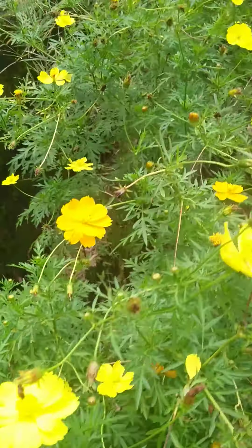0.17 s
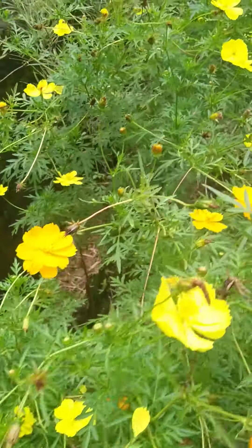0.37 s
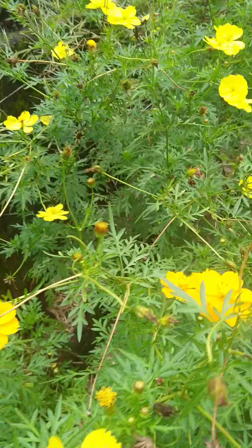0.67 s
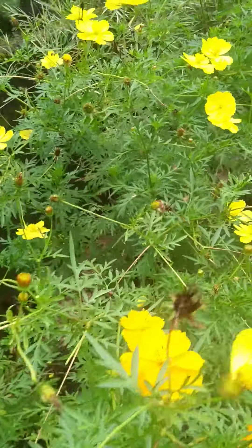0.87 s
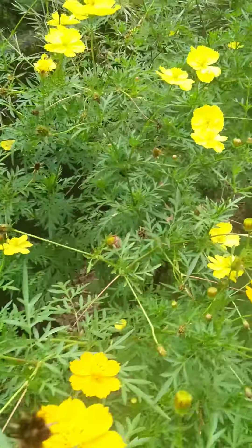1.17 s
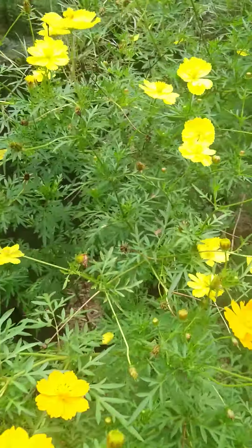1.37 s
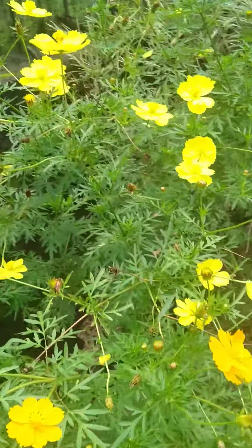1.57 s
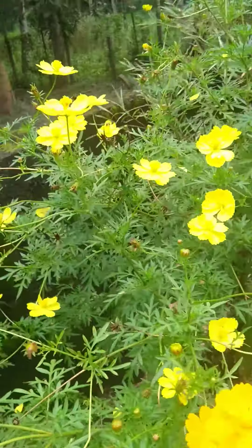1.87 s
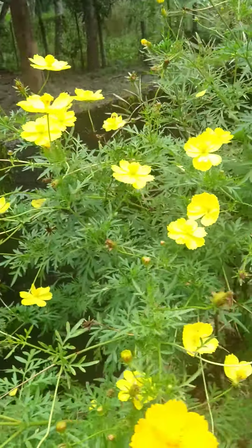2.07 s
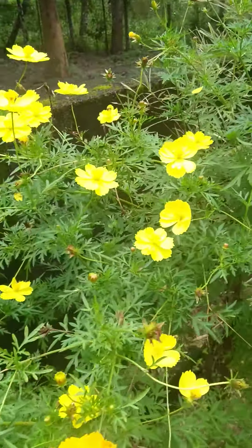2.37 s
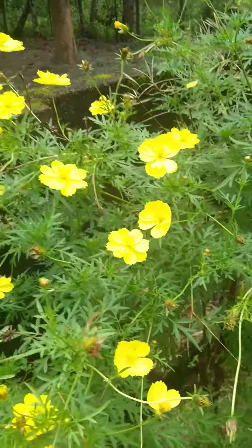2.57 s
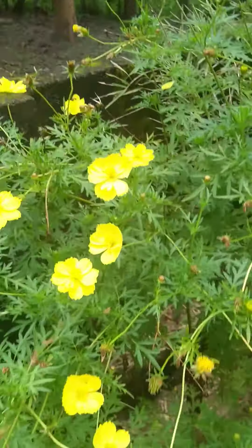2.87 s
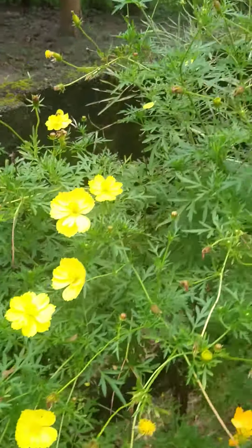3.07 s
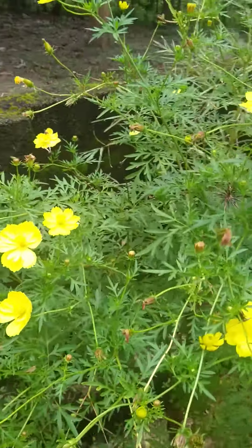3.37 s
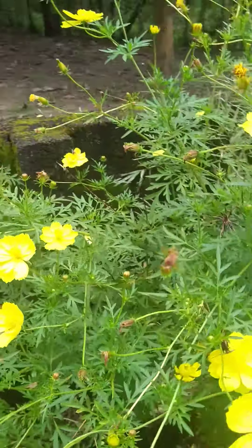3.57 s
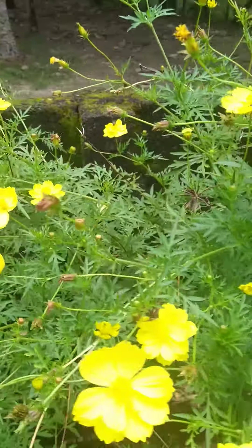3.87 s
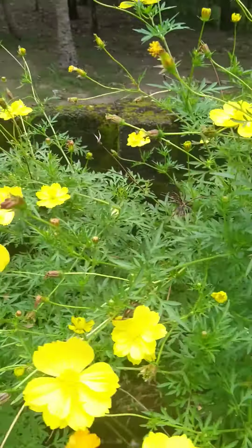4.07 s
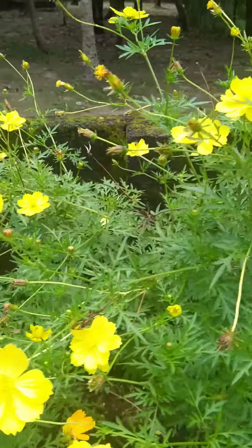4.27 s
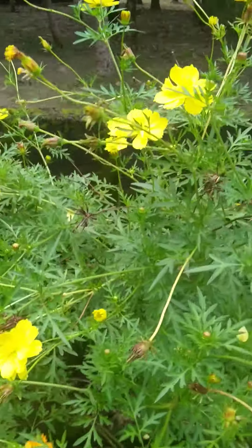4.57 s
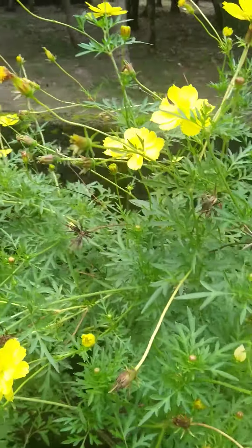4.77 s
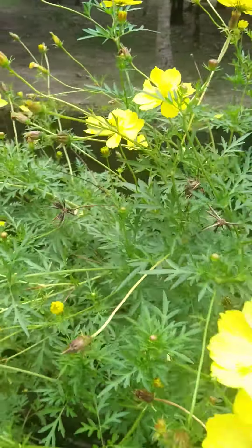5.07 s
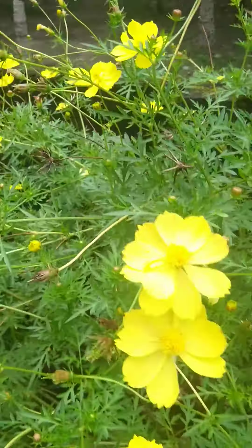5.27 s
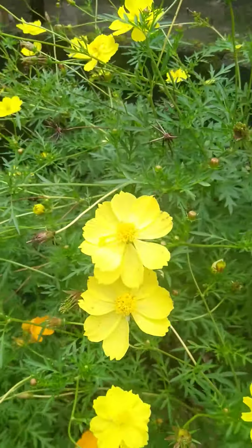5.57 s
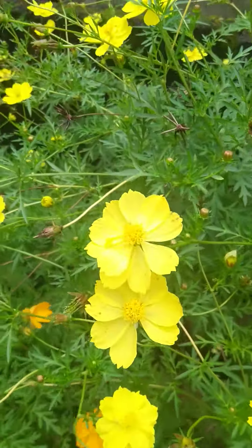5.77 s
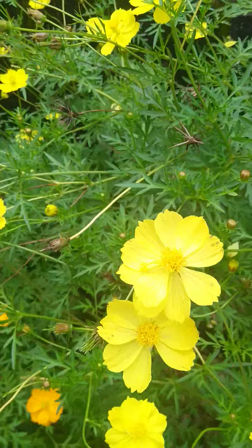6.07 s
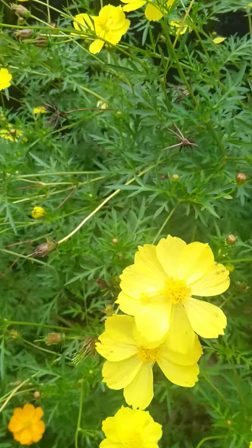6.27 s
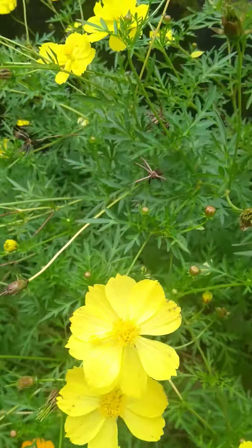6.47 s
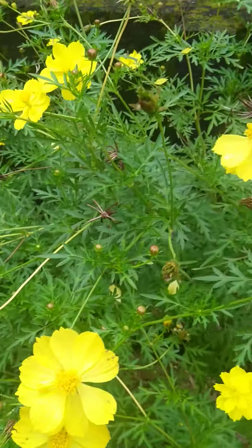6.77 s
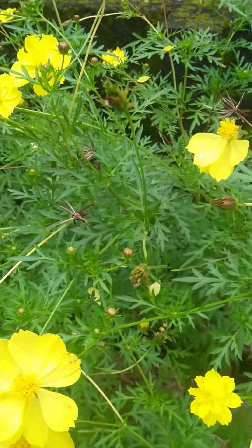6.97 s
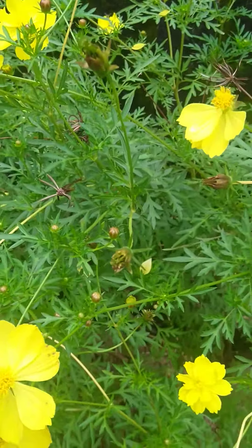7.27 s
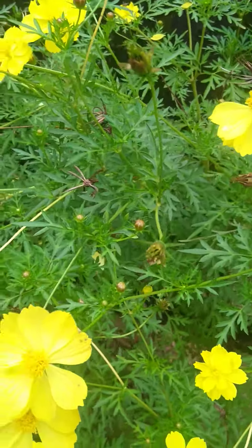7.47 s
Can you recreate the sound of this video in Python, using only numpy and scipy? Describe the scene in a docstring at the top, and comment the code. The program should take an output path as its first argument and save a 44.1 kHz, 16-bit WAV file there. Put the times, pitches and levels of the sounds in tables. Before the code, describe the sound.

Outdoors in a wooded park, a flock of harsh birds squawks almost continuously, calls overlapping with short echoes among the trunks. A hand-held phone moves along flowers: dull low bumps and rumble are strongest in the first three seconds, with scuffs and dry ticks. Leaves brush past around five seconds, then the bird chorus thickens towards the end.

```python
"""A wooded park: a flock of harsh-voiced birds squawks, calls overlapping and ringing among the trunks.
Each squawk is a stack of harmonics on an arch of pitch, shaken by a rasping syrinx and coloured by the throat;
a few sliding sines whistle between them, and rougher far calls answer in bouts.
A hand-held phone moves along a flower bed: damped sine bumps, and filtered noise for scuffs, rustling leaves,
twig ticks, a low rumble and a faint hush."""
import sys
import numpy as np
from scipy import signal
from scipy.fft import rfft, irfft, next_fast_len
from scipy.io import wavfile

SR = 44100
rng = np.random.default_rng(int(sys.argv[2]) if len(sys.argv) > 2 else 0)


def wrap_up_sound(samples):
    """Save the sound to the file named by the first command line argument, as 16-bit audio."""
    columns = np.atleast_2d(samples).T
    # keep every value between -1 and 1, then stretch to whole-number steps
    tamed = np.clip(columns, -1, 1)
    steps = np.round(tamed * 32767).astype(np.int16)
    wavfile.write(sys.argv[1], SR, steps)


N = 336483
TIME = np.arange(N) / SR
TOP_HZ = 15500  # upper limit of the whole scene

# Firm bumps of steps and of the hand on the phone: [t/s, strength/dB, ring f/Hz]
BUMPS = [(.01, -24.5, 278), (.19, -33, 256), (.49, -17, 151), (0.528, -13.5, 124), (.606, -16, 194),
         (0.699, -14.5, 133), (1.186, -30.5, 76), (1.816, -27, 147.5), (2.421, -47.5, 232),
         (2.495, -18, 181), (2.565, -18, 245), (2.637, -15.5, 216), (2.82, -14, 190), (2.88, -18, 158),
         (3.572, -18.5, 194), (3.609, -26, 220), (4.068, -19, 207), (4.148, -23.5, 205.5),
         (4.252, -29.5, 201), (4.418, -26.5, 215), (4.564, -23.5, 194), (5.519, -30, 190),
         (5.735, -25, 176), (5.873, -32.5, 127), (5.96, -21, 177), (6.01, -24.5, 210),
         (6.065, -25.5, 169.4), (6.454, -25.5, 166), (6.508, -29.5, 200), (6.546, -27.5, 190),
         (6.894, -48, 198), (6.991, -26, 180), (7.103, -30, 190), (7.391, -34, 190)]


def undb(db):
    """Decibels to gain."""
    return 10 ** (np.asarray(db) / 20)


def unit(x):
    """Scale to rms 1."""
    return x / np.sqrt(np.mean(x ** 2) + 1e-20)


def colour(x, points, tilt_db=0):
    """Filter by an outline of [f/Hz, level/dB], tilted about 4096 Hz by so many dB an octave."""
    n = x.shape[-1]
    size = next_fast_len(n + 1024)
    octave = np.log2(np.maximum(np.fft.rfftfreq(size, 1 / SR), 1))
    hz, db = np.transpose(points)
    outline_db = np.interp(octave, np.log2(hz), db)
    # the tilt levels off below 1024 Hz and above 8192 Hz
    lean_db = tilt_db * (np.clip(octave, 10, 13) - 12)
    return irfft(rfft(x, size) * undb(outline_db + lean_db), size)[..., :n]


def wobble(n, hz):
    """Random motion of rms 1: noise low-passed at hz, with the filter already settled."""
    lead = SR // 10
    lowpass = signal.butter(2, hz, fs=SR, output="sos")
    return unit(signal.sosfilt(lowpass, rng.standard_normal(n + lead))[lead:])


def swell(t, length, attack, release):
    """Smooth opening and closing of a sound (times in s)."""
    opening = np.sin(np.pi / 2 * np.clip(t / attack, 0, 1))
    closing = np.sin(np.pi / 2 * np.clip((length - t) / release, 0, 1))
    return opening * closing


def add(out, s, x):
    """Mix x into out from time s; it may already be sounding at the start."""
    i = int(s * SR)
    x, i = x[..., max(-i, 0):], max(i, 0)
    out[..., i:i + x.shape[-1]] += x[..., :max(N - i, 0)]


def stereo_noise(n, shared):
    """Noise at two ports, with a share of its power in common."""
    common = rng.standard_normal(n)
    separate = rng.standard_normal((2, n))
    return np.sqrt(shared) * common + np.sqrt(1 - shared) * separate


def hush(level_db=-70):
    """The faint hush of the park: steady, wide, coloured noise."""
    # Outline of the hush: [f/Hz, level/dB]
    air = [(200, 18), (600, 13.5), (1200, -7), (2200, 12.5), (4500, 1.5), (8000, -1), (14000, -4),
           (16000, -37)]
    return undb(level_db) * unit(colour(stereo_noise(N, 0.083), air))


def rumble(base_db=-48.5, heave_db=1.0, heave_hz=9.7):
    """Low noise that heaves gently at random and swells now and then."""
    # Outline of the rumble: [f/Hz, level/dB]
    low_outline = [(20, -22), (38, -13.5), (70, 6), (120, 1), (185, -5.5), (250, -21), (330, -60),
                   (900, -84)]
    # Swells of the rumble: [peak t/s, half width/s, rise/dB]
    swings = [(.64, 0.18, 16), (1.131, 0.13, 8), (1.548, 0.037, 9.5), (1.95, 0.13, 0.5), (2.7, 0.3, 4),
              (3.55, 0.15, 7)]
    swings_db = sum(db * np.exp(-((TIME - s) / width) ** 2) for s, width, db in swings)
    level_db = base_db + swings_db + heave_db * wobble(N, heave_hz)
    return unit(colour(stereo_noise(N, .42), low_outline)) * undb(level_db)


def scuffs(grain_db=4, grit_s=0.063, grit_db=-34, firm_hz=190):
    """Scraped soil: coloured noise with a grainy level, in long scuffs and in the grit each bump drags."""
    # Longer scuffs on the soil: [t/s, length/s, level/dB]
    long_scuffs = [(0.165, 0.24, -56.5), (0.501, 0.3, -54), (1.639, 0.29, -60), (2.52, 0.5, -54),
                   (3.033, 0.087, -54.5), (3.572, 0.19, -52), (4.407, 0.13, -51.5), (4.881, 0.18, -53),
                   (5.652, 0.18, -54), (6.453, 0.28, -57), (6.882, 0.18, -42.5), (7.02, 0.58, -55)]
    # Outline of the scraping: [f/Hz, level/dB]
    soil = [(100, -4), (280, 1), (550, 3.5), (900, -4.5), (1600, -2.5), (4000, -37), (10000, -8),
            (15000, -38)]
    dragged = []
    for s, db, hz in BUMPS:
        # a bump that rings below firm_hz is soft and drags less grit
        softness_db = 40 * np.log10(min(hz / firm_hz, 1))
        dragged.append((s, grit_s, db + grit_db + softness_db))
    out = np.zeros((2, N))
    for s, length, db in list(long_scuffs) + dragged:
        t = np.arange(int(length * SR)) / SR
        grit = stereo_noise(len(t), 0.21) * undb(grain_db * wobble(len(t), 22))
        envelope = swell(t, length, .15 * length, .6 * length)
        add(out, s, undb(db) * unit(colour(grit, soil)) * envelope)
    return out


def bumps(decay_cycles=0.51, rise_cycles=1.25, thud_db=-10, contact_lift=1.34, contact_s=0.0014):
    """Heavily damped rings with a dull noise thud, close to the phone; a lower ring dies more slowly."""
    out = np.zeros((2, N))
    t = np.arange(SR // 10) / SR
    for s, db, hz in BUMPS:
        # the ring starts high at first contact and drops to its own pitch
        cycles = hz * (t + contact_lift * contact_s * (1 - np.exp(-t / contact_s)))
        lowpass = signal.butter(2, 1.75 * hz, fs=SR, output="sos")
        thud = unit(signal.sosfilt(lowpass, stereo_noise(len(t), 0.27)))
        knock = np.sin(2 * np.pi * cycles) + undb(thud_db) * thud
        envelope = 2 * np.minimum(t * hz / rise_cycles, 1) * np.exp(-t * hz / decay_cycles)
        add(out, s, undb(db) * knock * envelope)
    return out


def ticks(decay_s=0.000053):
    """Dry stems snap: an instant of noise rings a narrow band."""
    # Ticks of the stems: [t/s, peak level/dB, centre f/Hz]
    snaps = [(0.571, -23, 2540), (0.623, -39, 1120), (1.874, -10.5, 8300), (2.612, -24.5, 5830),
             (2.82, -30, 3420), (2.825, -24, 820), (2.884, -31, 1080)]
    out = np.zeros((2, N))
    t = np.arange(SR // 10) / SR
    for s, db, hz in snaps:
        band = [(hz / 4, -26), (hz, 0), (hz * 1.6, -28), (hz * 4, -42)]
        snap = colour(stereo_noise(len(t), .4) * np.exp(-t / decay_s), band)
        add(out, s, undb(db) * snap / np.abs(snap).max())
    return out


def leaves(grain_db=3, grain_hz=150):
    """Feathery leaves brush past the phone: wide, bright noise with a fast random flicker."""
    # Brushes of the leaves: [t/s, length/s, level/dB]
    brushes = [(2.568, 0.12, -53.5), (4.886, 0.43, -47.5), (5.091, 0.035, -37), (5.307, 0.12, -52)]
    # Outline of the rustle: [f/Hz, level/dB]
    leaf = [(2000, -14.5), (6000, -4), (10500, 0.5), (13000, -9), (15500, -18)]
    out = np.zeros((2, N))
    for s, length, db in brushes:
        t = np.arange(int(length * SR)) / SR
        rustle = stereo_noise(len(t), 0.062) * undb(grain_db * wobble(len(t), grain_hz))
        envelope = swell(t, length, .2 * length, .7 * length)
        add(out, s, undb(db) * unit(colour(rustle, leaf)) * envelope)
    return out


def grove(x, s, far_db, tail_db=-8):
    """A sound from its own perch: direct path, quick scatter off ground and wall, and a tail set by far_db."""
    # The phone turns past the flock: [t/s, lead of the left port/ms]
    bearing = [(0, -0.055), (2.5, -0.07), (3.1, 0.39), (4.2, 0.35), (7.6, 0.41)]
    early_s, spread_ms = .004, .03
    low_t60, full_t60 = .46, .42  # seconds to fall by 60 dB
    t = np.arange(SR * 2 // 3) / SR
    lead_ms = np.interp(s, *np.transpose(bearing)) + spread_ms * rng.standard_normal()
    lead = lead_ms * SR / 1000
    # fractional delays place the call between the ports
    taps = np.arange(len(t)) - 32
    direct = np.array([np.sinc(taps + side * lead / 2) for side in (1, -1)])
    early = rng.standard_normal((2, len(t))) * np.exp(-t / early_s) * (t > .001)
    # the tail builds up over 95 ms; its lows last a little longer
    noise = rng.standard_normal((2, len(t))) * np.minimum(t / 0.095, 1)
    low = signal.sosfilt(signal.butter(3, 2400, fs=SR, output="sos"), noise)
    tail = low * undb(-60 * t / low_t60) + noise[::-1] * undb(-60 * t / full_t60)
    echoes = unit(early) + undb(tail_db + far_db) * unit(tail)
    paths = direct + echoes / np.sqrt(len(t))
    heard = signal.fftconvolve(x[None], paths, axes=1)
    # the paths spread the energy in time without adding to it
    return heard * np.linalg.norm(x) / np.linalg.norm(heard, axis=1, keepdims=True)


def arch(length, top_hz, rough):
    """Rise and fall times and start, top and end pitch of a far call, shaped by its pitch and roughness."""
    height = np.log2(top_hz / 1989)  # octaves above the usual pitch
    # a higher call climbs for a larger share of its length
    share = np.clip(.44 + 0.228 * height, .1, .9)
    # a rougher call starts lower; a rougher or deeper one sags further (octaves)
    scoop = .16 + .26 * rough
    sag = .1 + .35 * rough - .22 * height
    return share * length, (1 - share) * length, top_hz / 2 ** scoop, top_hz, top_hz / 2 ** sag


def chatter(calls_per_s=8, bright_db=3.5, low_hz=1900, high_hz=2450, short_s=0.11, long_s=0.31):
    """Far birds squawk at random through each bout, each with its own pitch and length."""
    # Spells in which the rest of the flock joins in, deeper in the trees: [t/s, length/s, level of a call/dB]
    bouts = [(1.398, .41, -41), (2.455, 0.27, -64), (3.198, 0.53, -46.5), (3.846, 0.28, -43.5),
             (4.149, .5, -46.5), (4.979, 0.82, -42), (6.152, 1.33, -36)]
    far_db, clear, harsh = 5, .5, 1.25  # extra tail; range of roughness
    out = np.zeros((2, N))
    for start, length, db in bouts:
        count = round(length * calls_per_s)
        for k, (when, depth, hold) in enumerate(rng.random((count, 3))):
            s = start + (k + when) * length / count
            # the deeper a bird calls, the rougher
            rough = clear + depth * (harsh - clear)
            call_s = short_s + hold * (long_s - short_s)
            shape = arch(call_s, high_hz - depth * (high_hz - low_hz), rough)
            call = squawk(*shape, rough, bright_db)
            add(out, s, undb(db) * grove(call, s, far_db))
    return out


def whistles():
    """Whistled notes: quavering sines gliding along a parabola of pitch."""
    # Notes: [t/s, length/s, start f/Hz, middle f/Hz, end f/Hz, level/dB, quaver/share of the pitch]
    notes = [(1.067, 0.085, 3100, 2540, 2450, -67, 0.0057), (1.8, 0.11, 993, 838, 890, -55, 0.03),
             (2.043, 0.078, 1590, 1628, 1485, -33, 0.0058), (2.104, 0.051, 1472, 1160, 1170, -51, 0.011),
             (2.143, 0.16, 1310, 1324, 1183, -44.5, 0.025)]
    out = np.zeros((2, N))
    for s, length, start_hz, middle_hz, end_hz, db, quaver in notes:
        t = np.arange(int(length * SR)) / SR
        glide = np.polyfit([0, length / 2, length], [start_hz, middle_hz, end_hz], 2)
        hz = np.polyval(glide, t) * (1 + quaver * wobble(len(t), 200))
        note = unit(np.sin(2 * np.pi * np.cumsum(hz) / SR) * swell(t, length, 0.019, 0.0085))
        add(out, s, undb(db) * grove(note, s, -4))
    return out


def squawk(rise, fall, start_hz, top_hz, end_hz, rough, bright_db, second_db=0, edge_db=-6):
    """One call: pressure lifts pitch and level in an arch; the syrinx rasps most at its slack ends."""
    # Resonances of the birds' throat and beak: [f/Hz, level/dB]
    throat = [(700, -43), (1050, -44.5), (1300, -14), (1600, -7), (2200, -5.5), (2700, -8), (3250, -9.5),
              (3750, -9), (4250, -4.5), (4600, -6.5), (5050, -11), (6500, -19), (7500, -30.5),
              (9000, -27.5), (11300, -32), (13500, -36), (15500, -66.5)]
    # Outline of the screech noise: [f/Hz, level/dB]
    screech_outline = [(2400, -4), (4000, 5.5), (7000, 8.5), (14000, -9)]
    jitter, jitter_hz, waver, waver_hz = .056, 420, .017, 62.2  # pitch shake, as shares of the pitch
    fray, fray_per_rasp, fray_hz = .35, .22, 170  # phase shake in radians
    flutter, flutter_hz = .3, 240  # shake of the level
    edge_rough, hiss_db, screech_db = .45, -13, -13
    attack, release, sag_power = .04, .052, 1.6
    t = np.arange(int((rise + fall) * SR)) / SR
    n = len(t)

    # slack is 0 at the top of the arch and 1 at either end
    slack = np.where(t < rise, (1 - t / rise) ** 2, np.abs((t - rise) / fall) ** sag_power)
    hz = top_hz + slack * (np.where(t < rise, start_hz, end_hz) - top_hz)
    rasp = rough + edge_rough * slack * max(1 - rough, 0)
    shake = jitter * wobble(n, jitter_hz) + waver * wobble(n, waver_hz)
    phase = 2 * np.pi * np.cumsum(hz * (1 + rasp * shake)) / SR

    # the rasp frays each harmonic into a band
    tone = np.zeros(n)
    for k in range(1, int(TOP_HZ / top_hz) + 2):
        frayed = (fray + fray_per_rasp * rasp) * wobble(n, fray_hz)
        harmonic = np.sin(k * phase + frayed + rng.uniform(0, 2 * np.pi))
        tone += undb(second_db * (k == 2)) * harmonic

    # turbulent air sounds mostly at the throat's strongest resonances, so it passes them twice
    hiss = unit(colour(colour(rng.standard_normal(n), throat), throat, bright_db))
    # a broad screech fills the gaps between the upper harmonics
    screech = colour(rng.standard_normal(n), screech_outline)
    source = unit(tone) + undb(screech_db) * np.sqrt(rasp) * screech
    voice = unit(colour(source, throat, bright_db)) + undb(hiss_db) * rasp * hiss
    voice = unit(voice * np.exp(flutter * wobble(n, flutter_hz)))
    return voice * undb(edge_db * slack) * swell(t, rise + fall, attack, release)


def flock(faint_db=-33, tail_per_db=-0.25):
    """The single squawks, near and far, each from its own perch; below faint_db the tail thins a little."""
    # Squawks: [t/s, rise/s, fall/s, start f/Hz, top f/Hz, end f/Hz, level/dB,
    #   roughness/0 clear to about 1 harsh, tilt/dB an octave, second harmonic/dB]
    squawks = [ (-.04, 0.15, 0.079, 1970, 2302, 2160, -24.5, 0.26, 8, 2),
               (.2, .06, 0.093, 1538, 1994, 1627, -30, 1.09, 6.5, -8),
               (.295, 0.033, 0.15, 1635, 1599, 1302, -32, 1.06, 6, -1),
               (.5, 0.055, 0.083, 1162, 1494, 1368, -31, 0.62, 6, -4),
               (0.592, 0.032, 0.16, 1405, 1375, 1260, -35, 0.79, 6.5, -2),
               (.812, 0.043, 0.11, 1000, 1293, 958, -37, 0.84, 3, 0.5),
               (1.295, 0.082, 0.078, 1060, 1332, 1268, -33.5, 0.84, 4.5, -2),
               (1.4, 0.08, 0.055, 1620, 2258, 2163, -25.5, 0.58, 8, -.5),
               (1.562, 0.071, 0.11, 1646, 2166, 1827, -30, 0.65, 8, -5),
               (1.795, 0.059, .17, 1074, 1500, 1037, -33.5, 0.73, 7, 3),
               (2.095, .11, 0.13, 941, 1662, 1153, -31.5, 0.94, 5.5, -2.5),
               (2.373, 0.056, 0.15, 956, 1369, 864, -35, 0.59, 5, 7),
               (2.68, .08, 0.086, 1455, 2050, 1535, -45.5, 0.69, 1, -19),
               (3.028, .04, 0.14, 1180, 1550, 1460, -44, 1.6, -10, 26),
               (3.071, 0.085, 0.11, 1409, 1910, 1396, -30.5, 0.85, 5.5, -4.5),
               (3.211, 0.036, 0.11, 1500, 1465, 1223, -34.5, 0.79, 7, -1),
               (3.401, 0.071, 0.11, 1102, 1574, 1380, -30.5, 0.85, 7, -3),
               (3.55, 0.041, .13, 1406, 1422, 1249, -32, 0.97, 5.5, -2.5),
               (3.726, 0.097, 0.14, 1720, 2162, 1880, -25.5, .42, 6, -1),
               (3.995, 0.043, 0.091, 1543, 2194, 1540, -33.5, 1.13, 2.5, 0.5),
               (4.18, 0.14, 0.12, 1650, 2225, 2163, -40, 1.02, 1.5, -2),
               (4.41, 0.11, 0.07, 2200, 2417, 2370, -44, 0.2, -2.5, 1),
               (4.58, .07, 0.082, 2200, 2370, 2340, -42.5, .15, -8.5, 1.5),
               (4.68, 0.062, 0.18, 2378, 2400, 2390, -56, 0.19, -9, 11),
               (4.959, 0.11, 0.079, 1780, 2227, 2220, -34, 0.88, 2, 0),
               (5.057, 0.1, 0.097, 2354, 2450, 2370, -44, 0.11, 3.5, -5),
               (5.246, 0.059, 0.047, 2120, 2307, 2360, -35, 0.11, 2, 1),
               (5.291, .05, 0.15, 1550, 1840, 1700, -41, 1.46, 5, -12),
               (5.52, 0.057, 0.059, 2256, 2460, 2350, -47.5, .3, 7, 2),
               (5.612, 0.082, 0.083, 1598, 2221, 2063, -34.5, 0.54, 4, -1.5),
               (5.76, 0.041, 0.062, 1748, 2166, 1870, -41.5, 1.27, 5.5, -3),
               (5.906, 0.072, 0.12, 2070, 2217, 2085, -35.5, 0.21, 4, -3),
               (6.138, 0.077, 0.075, 1072, 1413, 1394, -30, 0.93, 3.5, -1),
               (6.239, 0.059, 0.13, 1684, 2076, 1915, -30.5, 0.96, 6.5, -3),
               (6.394, .1, 0.13, 956, 1726, 1387, -31, 0.69, 7, 1.5),
               (6.467, 0.036, 0.097, 2130, 2296, 2230, -26.5, .05, 6.5, 2.5),
               (6.633, 0.057, .16, 939, 1527, 1211, -32, .62, 4.5, 0),
               (6.812, .045, 0.053, 1992, 2235, 2155, -29, 0.15, 6.5, -5.5),
               (6.865, 0.023, 0.08, 1907, 2150, 1514, -28.5, 1.11, 9.5, -5),
               (6.947, 0.072, 0.041, 1010, 1902, 1920, -28.5, 0.87, 9.5, 1.5),
               (6.99, 0.12, 0.097, 1952, 2274, 2120, -26.5, 0.26, 5.5, -5),
               (7.185, 0.041, 0.072, 1604, 2148, 1906, -29.5, 0.58, 10, -6),
               (7.239, 0.073, .13, 1008, 1442, 1294, -30.5, .75, 9, 3.5),
               (7.36, 0.04, 0.17, 2050, 2200, 2084, -43, 0.48, 10.5, -14),
               (7.582, 0.1, 0.11, 1632, 2033, 1682, -36, 0.87, 4, -11.5)]
    out = np.zeros((2, N))
    for s, rise, fall, start_hz, top_hz, end_hz, db, rough, tilt_db, second_db in squawks:
        fainter_db = max(faint_db - db, 0)
        call = squawk(rise, fall, start_hz, top_hz, end_hz, rough, tilt_db, second_db)
        add(out, s, undb(db) * grove(call, s, tail_per_db * fainter_db))
    return out


def scene():
    """The park's hush and rumble, the moving phone, and the birds in the trees."""
    park = hush() + rumble()
    handling = scuffs() + bumps() + ticks() + leaves()
    birds = chatter() + whistles() + flock()
    return park + handling + birds


def record(dry):
    """The left port is shaded, so the right hears more but at the very top; a steep filter cuts above TOP_HZ."""
    # Balance of the ports: [f/Hz, left minus right level/dB]
    shade = [(60, -7.5), (200, -13), (700, -6.5), (1300, -9), (2400, -7.5), (4400, -5.3), (8000, -3.5),
             (14000, .7)]
    left = colour(dry[0], [(hz, db / 2) for hz, db in shade])
    right = colour(dry[1], [(hz, -db / 2) for hz, db in shade])
    lowpass = signal.ellip(10, .2, 80, TOP_HZ, fs=SR, output="sos")
    return signal.sosfilt(lowpass, undb(-1.5) * np.array([left, right]))


dry = scene()
out = record(dry)
wrap_up_sound(out)
```